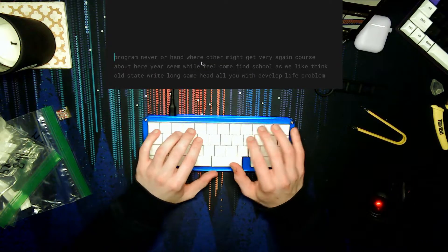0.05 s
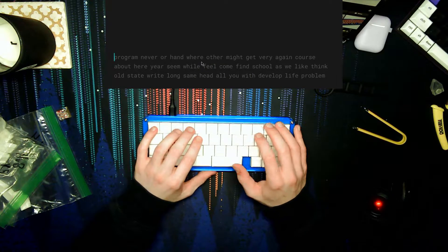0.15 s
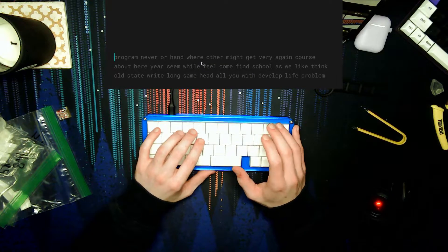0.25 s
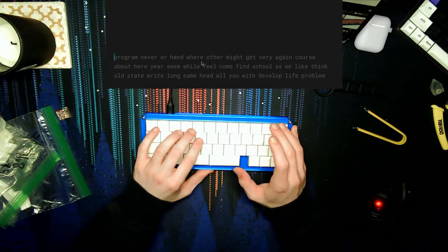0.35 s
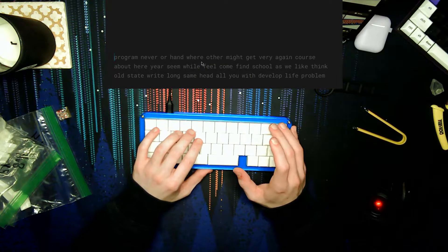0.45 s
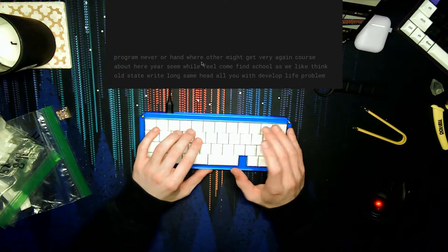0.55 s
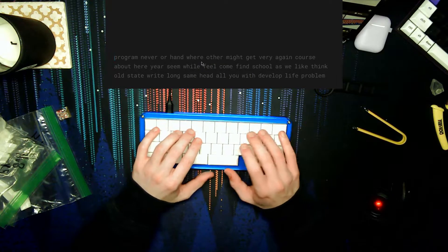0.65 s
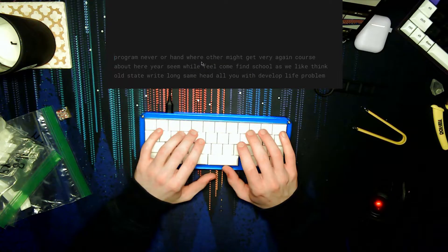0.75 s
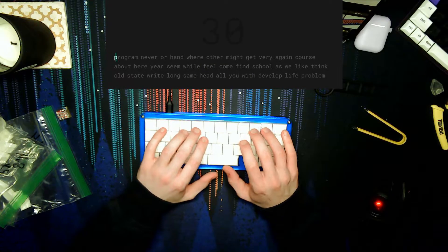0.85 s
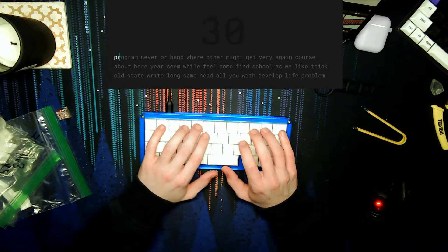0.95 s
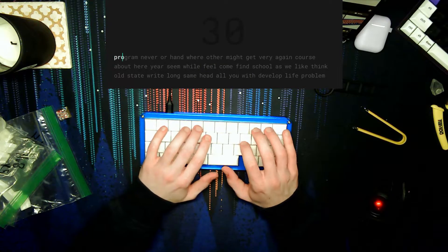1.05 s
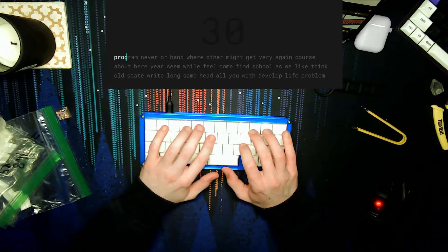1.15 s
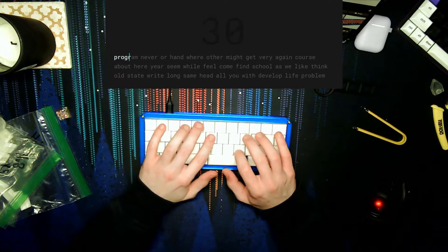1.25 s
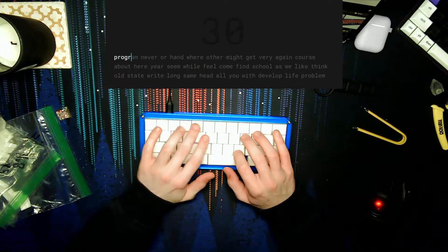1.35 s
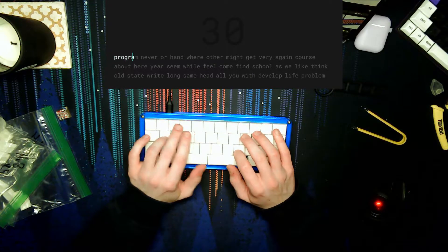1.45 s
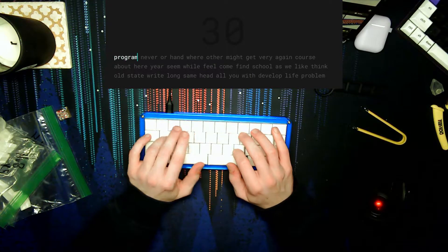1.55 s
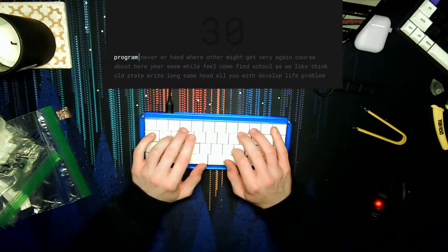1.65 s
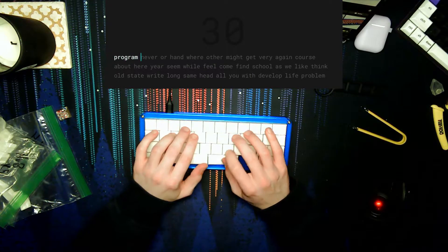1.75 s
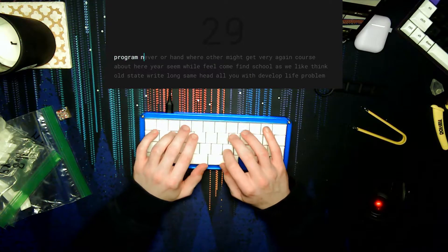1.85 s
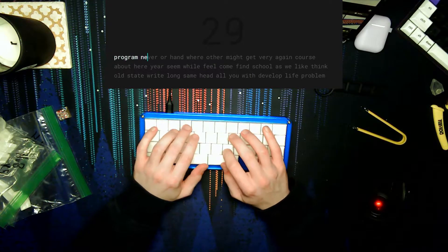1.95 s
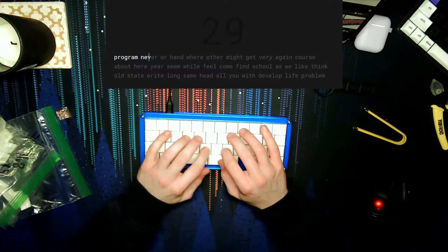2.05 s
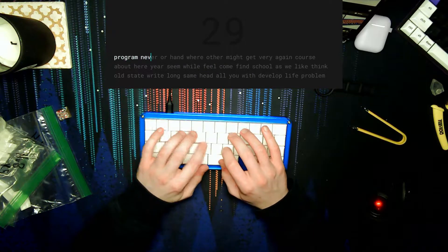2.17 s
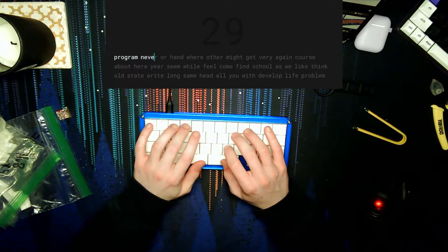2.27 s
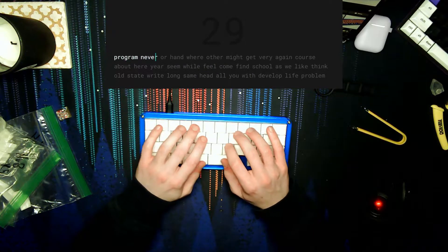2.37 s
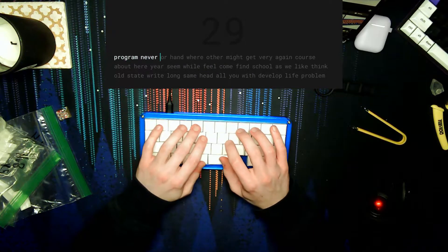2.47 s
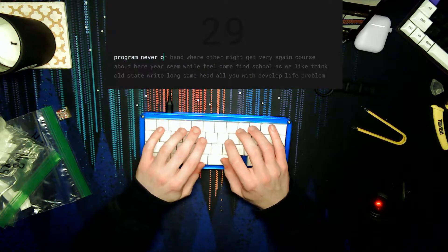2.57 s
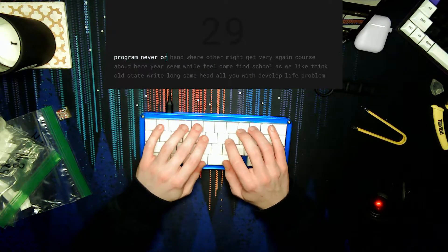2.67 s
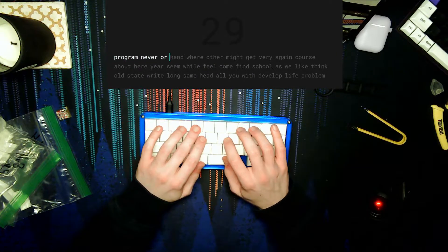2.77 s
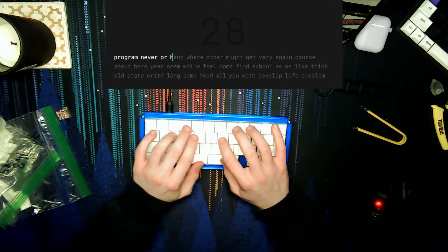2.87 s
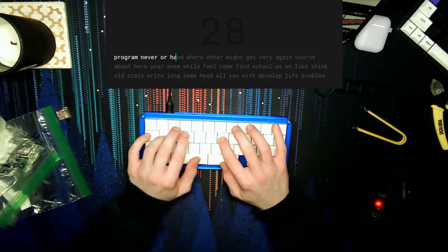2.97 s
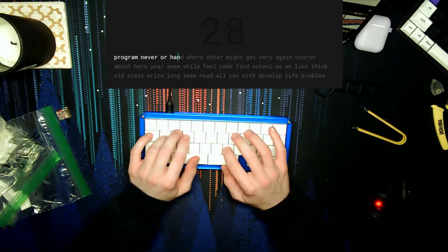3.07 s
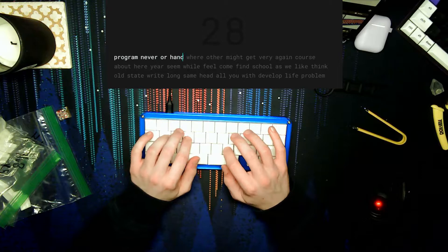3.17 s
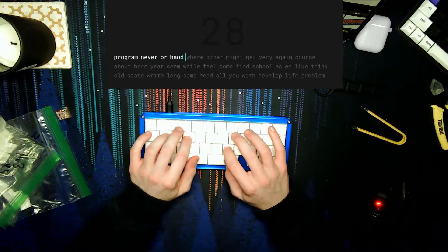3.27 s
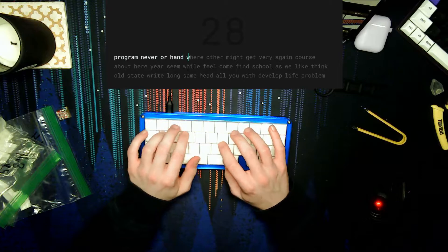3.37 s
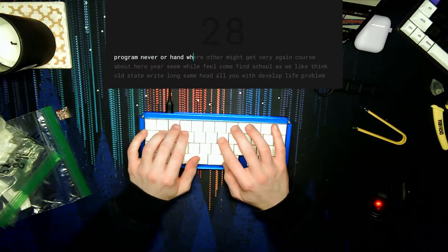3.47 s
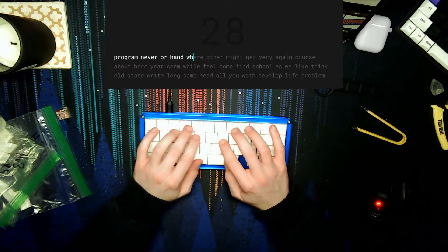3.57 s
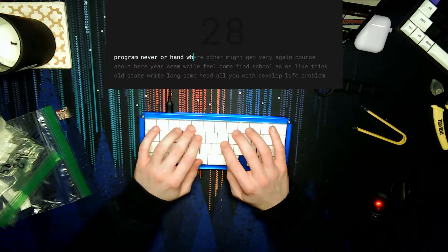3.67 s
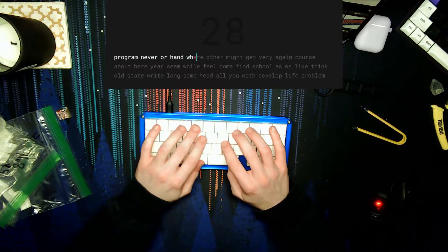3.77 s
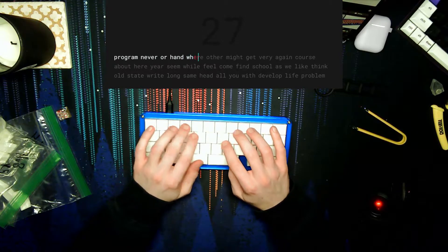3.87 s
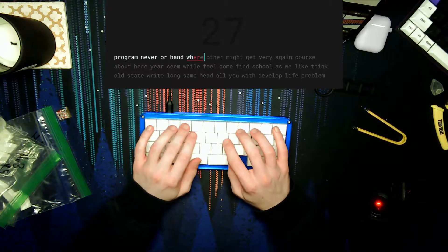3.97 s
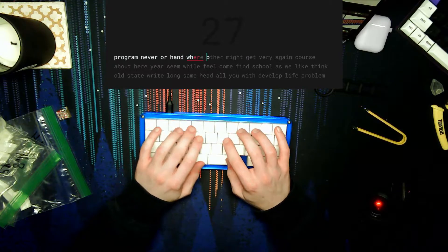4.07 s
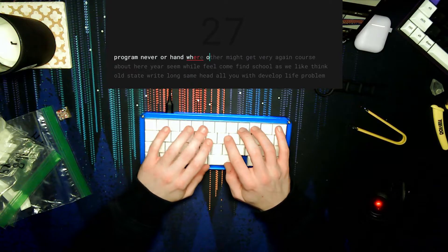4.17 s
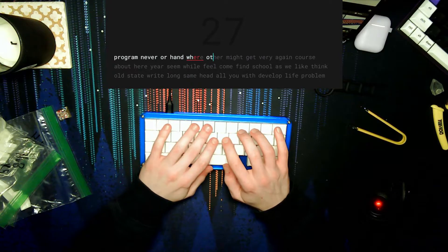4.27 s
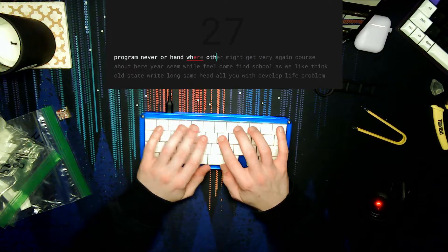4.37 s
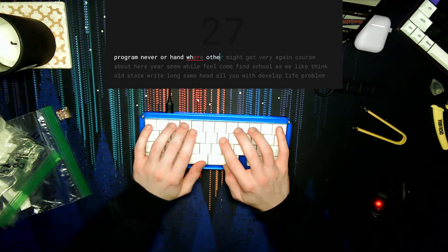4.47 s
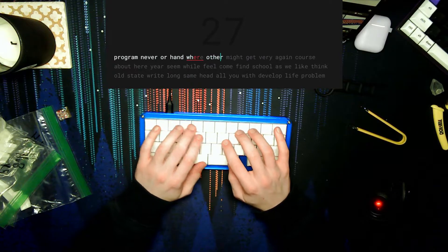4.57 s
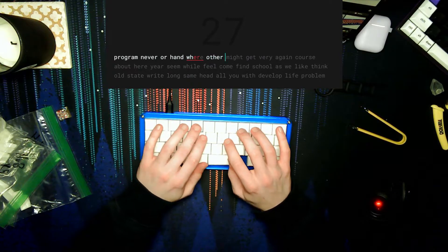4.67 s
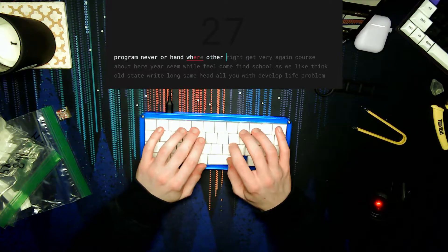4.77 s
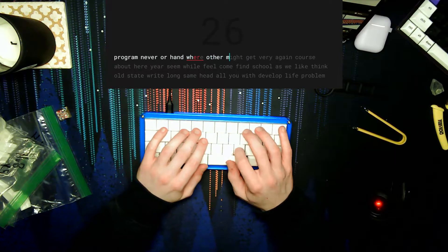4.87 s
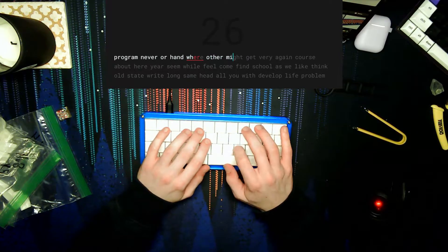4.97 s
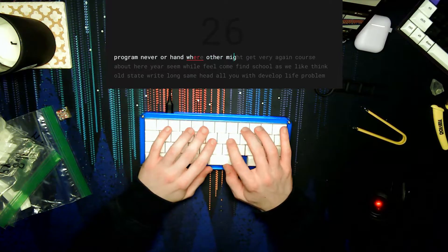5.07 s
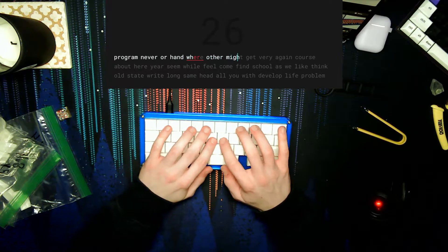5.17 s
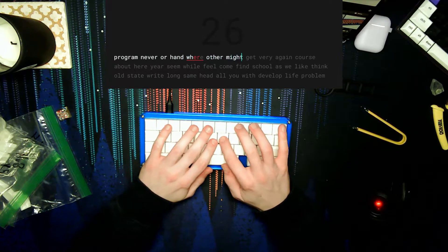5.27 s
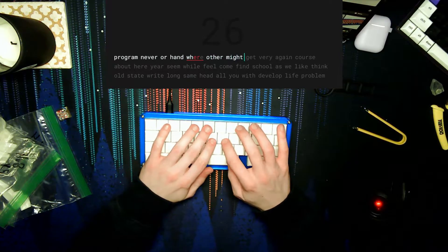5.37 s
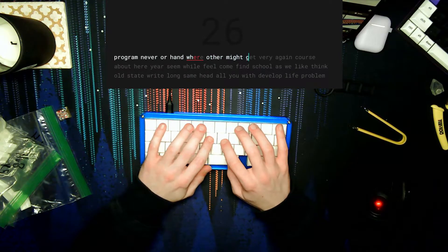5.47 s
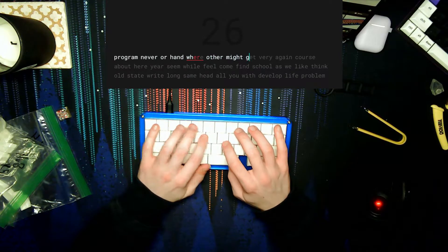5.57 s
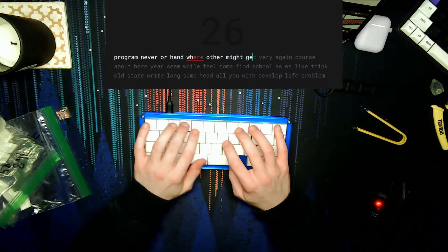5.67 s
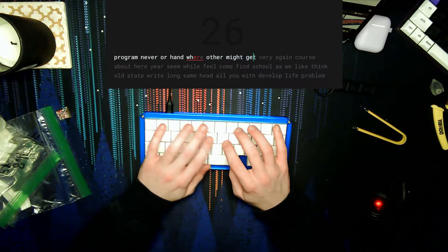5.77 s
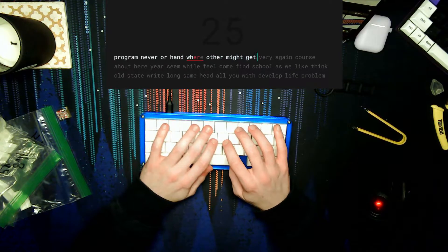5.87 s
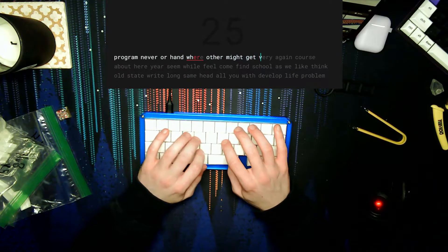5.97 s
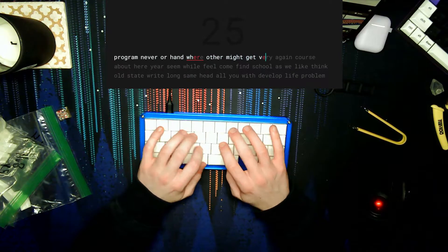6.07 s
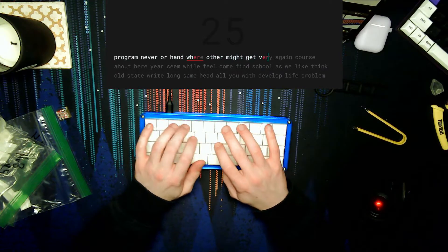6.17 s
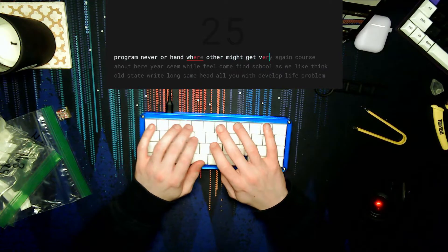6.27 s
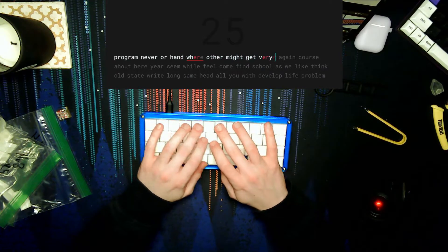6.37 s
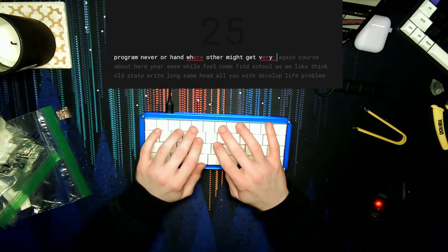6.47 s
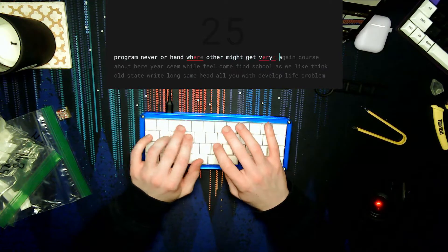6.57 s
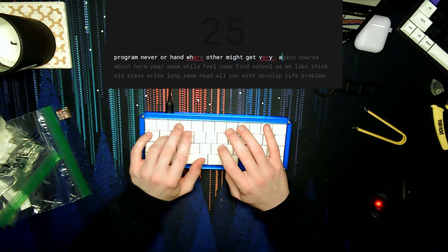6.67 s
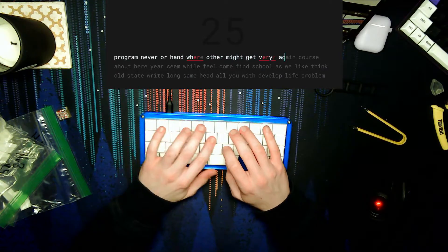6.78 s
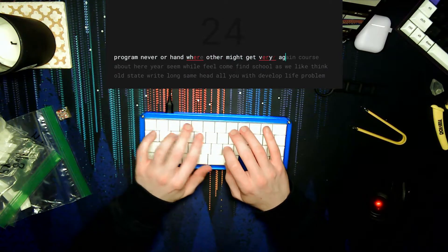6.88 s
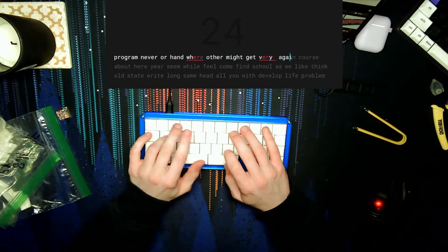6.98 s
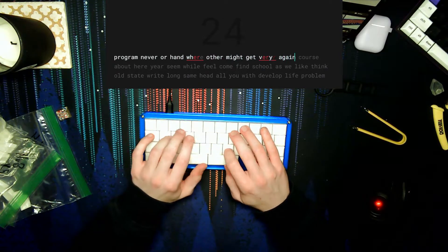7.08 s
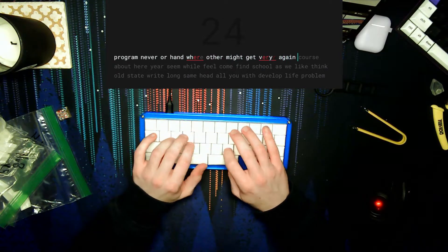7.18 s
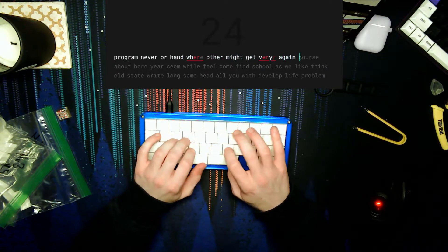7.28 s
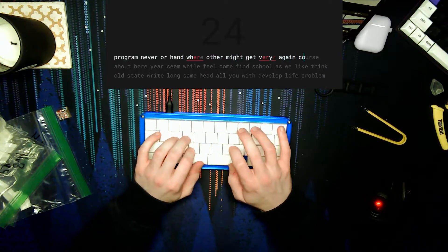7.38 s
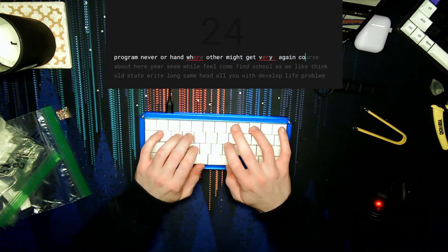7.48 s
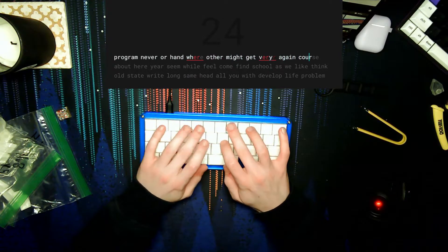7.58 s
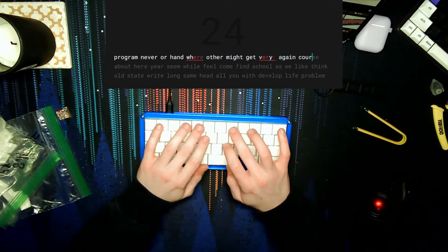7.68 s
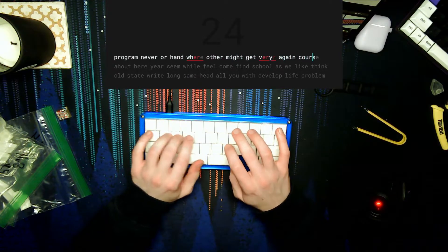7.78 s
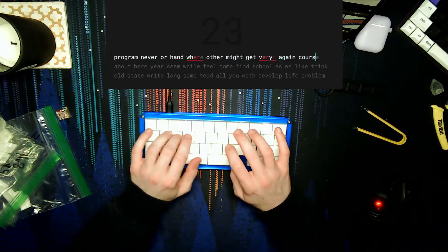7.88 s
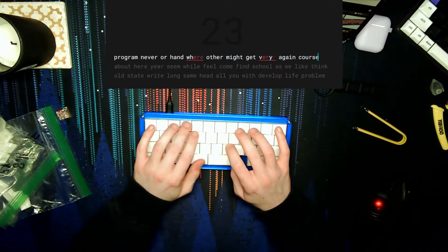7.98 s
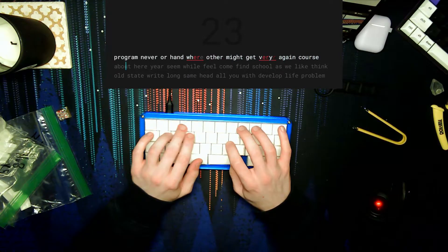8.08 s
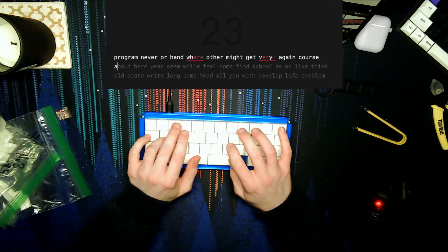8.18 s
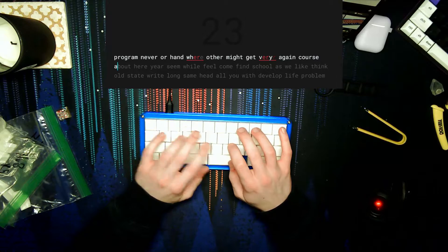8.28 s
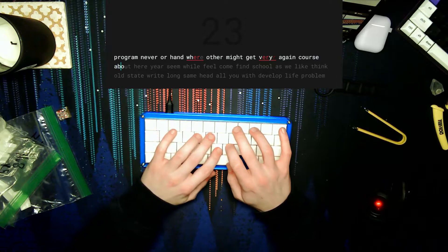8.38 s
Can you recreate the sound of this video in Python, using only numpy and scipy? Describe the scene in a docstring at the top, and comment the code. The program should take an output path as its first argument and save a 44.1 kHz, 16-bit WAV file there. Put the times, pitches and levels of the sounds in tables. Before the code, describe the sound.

A short rubbing slide and a pause, then rapid keyboard clacks with dull low thumps through the desk, close and dry over faint hiss.

```python
"""Fast typing on a small mechanical keyboard, heard by a microphone that stands on the same desk.
Each key clicks through the air: damped modes of stem and cap, with filtered noise bursts around them.
Pushes ring the modes of the desk in dull thuds and set it rocking on its legs, a pair of low resonances.
The stems scratch in their guides and a forearm slides over the desk mat: noise made by friction.
The microphone adds shaped hiss and a faint whine of harmonic sines."""
import sys
import numpy as np
from scipy.fft import rfft, irfft, next_fast_len
from scipy.io import wavfile
from scipy.ndimage import uniform_filter1d, map_coordinates

SR = 44100
rng = np.random.default_rng(int(sys.argv[2]) if len(sys.argv) > 2 else 0)


def pcm_store(signal):
    """Save signal as 16-bit PCM."""
    levels = np.round(np.clip(np.atleast_2d(signal), -1, 1) * 32767)
    wavfile.write(sys.argv[1], SR, levels.astype(np.int16).T)


N = 371763  # length of the scene [samples]
SCENE_T = np.arange(N) / SR  # [s]
EVENT_T = np.arange(SR // 8) / SR  # time within one short event [s]


def amp(db):
    """Decibels are a logarithm of amplitude: 20 dB is a factor of ten."""
    return 10 ** (np.asarray(db) / 20)


def unit_rms(x):
    """Normalization: the root mean square becomes one."""
    return x / np.sqrt(np.mean(x ** 2) + 1e-20)


def curves(rows):
    """Linear interpolation: one value per sample for each column after the time."""
    start_s, *columns = np.transpose(rows)
    return [np.interp(SCENE_T, start_s, column) for column in columns]


def wobble(rate_hz):
    """Band-limited randomness: a smooth curve through random knots, rate_hz of them a second."""
    knots = rng.standard_normal(int(N * rate_hz / SR) + 4)
    return map_coordinates(knots, [np.arange(N) * rate_hz / SR])


def filtered(x, response):
    """Linear filtering: the spectrum is multiplied by a complex response of frequency."""
    size = next_fast_len(N + SR // 2)  # spare room keeps tails from wrapping round
    spectrum = rfft(x, size) * response(np.fft.rfftfreq(size, 1 / SR))
    return irfft(spectrum, size)[:N]


def shaped(points):
    """Spectral envelope: gain through (Hz, dB) points on a logarithmic frequency axis."""
    point_hz, point_db = np.transpose(points)
    return lambda f: amp(np.interp(np.log(f + 1), np.log(point_hz), point_db))


def resonant(modes):
    """Modal superposition: (Hz, width Hz, dB) resonances add with alternating sign."""
    def response(f):
        total = 0
        for k, (center, width, db) in enumerate(modes):
            mode = 1j * f * width / (center * center - f * f + 1j * f * width)
            total = total + (-1) ** k * amp(db) * mode
        return total
    return response


def noise(response):
    """Coloured noise: white noise through a response, at unit RMS."""
    return unit_rms(filtered(rng.standard_normal(N), response))


def placed(times, rows):
    """Superposition in time: one row of samples is added at each time."""
    first = np.round(np.asarray(times) * SR).astype(int)[:, None]
    at = first + np.arange(rows.shape[1])
    return np.bincount(at.ravel(), rows.ravel(), N + SR)[:N]


def blow_envelope(level_db, t60, attack):
    """Damped response to a blow: quick exponential onset, then a fall of 60 dB in t60 seconds."""
    decay = amp(np.reshape(level_db, (-1, 1)) - 60 * EVENT_T / t60)
    return decay * (1 - np.exp(-EVENT_T / attack))


def ring(times, level_db, pitch_hz, t60, attack, spread, count=1):
    """Free vibration: each blow rings a cluster of close damped modes, scattered anew in pitch."""
    scatter = 1 + spread * rng.standard_normal((len(times), count, 1))
    mode_hz = np.reshape(pitch_hz, (-1, 1, 1)) * scatter
    tones = np.sin(2 * np.pi * mode_hz * EVENT_T).sum(1) / np.sqrt(count)
    return placed(times, blow_envelope(level_db, t60, attack) * tones)


def burst(times, level_db, t60, attack):
    """Impact noise: a puff of white noise after each blow."""
    white = rng.standard_normal((len(times), len(EVENT_T)))
    return placed(times, blow_envelope(level_db, t60, attack) * white)


# Spectral envelope of the hiss: pitch_hz [Hz], level_db [dB, relative]
HISS_SPECTRUM = [(25, -11), (60, -12), (105, -19), (180, -19), (300, -27), (550, -32.5), (1000, -36),
                 (2000, -40), (4000, -42.5), (9000, -44), (12000, -45.5), (15700, -48.5)]


def microphone_hiss():
    """Stationary random noise: a steady hiss, densest at low frequencies."""
    return amp(-58.5) * noise(shaped(HISS_SPECTRUM))


# Harmonics of the whine: multiple [of the fundamental], level_db [dB RMS]
WHINE_HARMONICS = [(1, -84), (3, -88), (4, -90), (5, -102), (6, -88.5), (7, -91.5), (10, -107.5), (12, -95),
                   (13, -105), (15, -99)]


def link_whine():
    """Harmonic series: the digital link leaks a comb of thin tones at multiples of one pitch."""
    link_hz = 1000
    whine = np.zeros(N)
    for multiple, level_db in WHINE_HARMONICS:
        tone = np.sin(2 * np.pi * multiple * link_hz * SCENE_T)
        whine += amp(level_db) * np.sqrt(2) * tone  # root two: a sine of unit RMS
    return whine


# Course of the slide: start_s [s], rumble_db, squeak_db, cloth_db [dB, before each layer's gain]
FOREARM_SLIDE = [(.14, -92, -97, -89), (.165, -51, -76, -81), (.2, -75, -77, -71), (.22, -60.5, -65, -66),
                 (.27, -61, -82, -71), (.32, -62, -69.5, -68), (.365, -62, -69, -66.5), (.4, -60, -86, -79),
                 (.43, -100, -105, -100)]
# Resonances of the mat: pitch_hz [Hz], width_hz [Hz], level_db [dB, relative]
MAT_MODES = [(163, 15, 4.5), (210, 85, -4.5), (294, 82, -6), (410, 43, -2.5)]
SLIP_PEAK_S, SLIPS_PER_S, SQUEAK_HZ = .215, 29, 964  # time of one slip's peak; mean squeak pitch


def forearm():
    """Stick-slip friction: the forearm judders over the mat, rumbling and squeaking; cloth hisses."""
    rumble_db, squeak_db, cloth_db = curves(FOREARM_SLIDE)
    slips = np.cos(np.pi * SLIPS_PER_S * (SCENE_T - SLIP_PEAK_S)) ** 2
    rumble = amp(rumble_db - 2.0) * (1.17 + slips) * noise(resonant(MAT_MODES))
    squeak_phase = 2 * np.pi * np.cumsum(SQUEAK_HZ + 15 * wobble(30)) / SR
    squeak = amp(squeak_db + 5.0) * slips * unit_rms(np.sin(squeak_phase))
    cloth = amp(cloth_db) * noise(resonant([(6540, 6300, 0)]))
    return rumble + squeak + cloth


# Pushes of the keyboard into the desk: start_s [s], rocking_db [dB, before the low-pass],
# low_db, middle_db, high_db [dB for each desk mode family, before the common gain]
DESK_PUSHES = [(0.554, -54, -59.5, -59.5, -65.0), (0.839, -39.5, -50.0, -45.0, -52.5),
               (0.926, -40, -46.0, -47.5, -50), (1.046, -39.5, -42.0, -38.0, -51.5),
               (1.112, -43.0, -42.5, -48, -67), (1.254, -40, -50.5, -51.5, -54.5),
               (1.452, -44, -46.5, -46, -52.5), (1.525, -58, -48.5, -50, -69),
               (1.631, -35.0, -47.5, -55.0, -49), (1.66, -49, -54, -46.5, -57),
               (1.782, -49, -42, -50, -72.0), (1.8, -46, -54, -43, -63.0),
               (1.867, -37.5, -48.5, -47.5, -57.5), (1.908, -68, -55, -52, -60),
               (2.03, -38.5, -46, -46, -63), (2.056, -66, -66, -45, -65), (2.125, -49, -63, -53.5, -60),
               (2.204, -54, -44, -46.5, -60), (2.376, -40, -43.5, -47.5, -53.0),
               (2.411, -38.0, -54, -57.0, -63), (2.483, -42.5, -48.5, -55, -62),
               (2.527, -44, -56, -48.5, -73.0), (2.603, -45.5, -49.5, -56, -58),
               (2.624, -61.0, -49, -49.5, -54), (2.71, -40.0, -50, -56, -61), (2.739, -47, -52, -45, -65),
               (2.835, -44, -41, -50, -57.5), (2.854, -53, -53.0, -45.5, -71),
               (2.948, -38, -54, -50.5, -55), (3.046, -41.5, -48.5, -49.0, -76),
               (3.081, -68.0, -56.0, -51, -76.0), (3.142, -52, -47.5, -64.0, -73.0),
               (3.218, -41.5, -68, -51.0, -53), (3.259, -36, -57.0, -42.5, -56),
               (3.343, -42, -52, -46.5, -60.0), (3.382, -36, -45, -48, -59), (3.402, -58, -52, -48.5, -60),
               (3.696, -46.5, -51.5, -52, -56.5), (3.84, -43.5, -44, -47.5, -56),
               (3.888, -62.0, -52, -53.0, -66), (3.923, -43.5, -57.0, -43, -63.0),
               (4.047, -42.0, -44, -44.0, -54), (4.155, -46.0, -44, -50.0, -53.5),
               (4.274, -50.5, -43, -44, -58.0), (4.307, -69.0, -60, -48, -65),
               (4.368, -45.5, -49, -49, -56.5), (4.388, -61, -49, -49, -64.0),
               (4.47, -49.5, -73.0, -54, -71), (4.564, -40.5, -42, -48, -50.5),
               (4.627, -43.5, -52.0, -42.5, -58), (4.738, -39, -65.0, -46.5, -80),
               (4.766, -56.0, -45, -45.5, -78), (4.789, -46, -49, -48, -76.0),
               (4.883, -41.0, -47, -50.5, -52.5), (5.051, -38.5, -64.0, -50.5, -73),
               (5.122, -40, -44, -50, -67), (5.139, -57, -50, -47, -58), (5.236, -41, -50.5, -50.5, -52.5),
               (5.322, -38.0, -57, -69, -55.5), (5.388, -48.0, -44, -51, -69), (5.42, -67, -52, -49, -64),
               (5.496, -57, -68, -56, -57.0), (5.547, -45.5, -48, -56.0, -57),
               (5.57, -57.0, -47, -54.0, -64), (5.749, -49.0, -45.5, -46, -48.5),
               (5.822, -49, -58.0, -54.0, -63.0), (5.862, -42.5, -64.0, -50, -61.0),
               (5.936, -44, -54, -46, -63.0), (6.117, -54, -42.0, -47, -58),
               (6.288, -44, -45, -51.5, -51.0), (6.432, -48, -52.5, -50, -52.5),
               (6.462, -41.0, -50, -42, -52.5), (6.557, -40, -48.5, -45.5, -57),
               (6.714, -51, -47.5, -46.5, -64), (6.733, -60.0, -45.5, -48, -60),
               (6.801, -52, -71, -57, -58), (6.873, -37.5, -62, -58, -57), (6.894, -54, -54.5, -47, -53.5),
               (6.978, -64, -48.5, -53, -67), (7.024, -37.5, -52, -45, -58),
               (7.142, -35.5, -49.0, -38, -50), (7.25, -34.5, -41, -45.0, -64), (7.333, -39, -46, -46, -56),
               (7.489, -52.0, -44.5, -46, -50.5), (7.758, -39, -51.5, -52, -63),
               (7.935, -40.0, -46, -49, -58), (7.979, -52, -50.5, -51, -56.5),
               (8.013, -49, -43.0, -42.5, -61), (8.097, -38.5, -57.0, -51, -60.5),
               (8.129, -46, -47, -49, -58), (8.288, -56, -42, -44.0, -62), (8.305, -56.0, -48.5, -40, -61),
               (8.384, -53.0, -56, -50.5, -57)]
# Modes of desk and case, one family per line: pitch_hz [Hz], level_db [dB, relative], t60_s [s]
DESK_MODES = [
    [(103.1, 3, 0.12), (62.9, -1.5, 0.19)],
    [(164.2, 3, 0.092), (199, -18.5, 0.043), (138.5, 0, 0.1)],
    [(288.5, -2, 0.1), (382.6, -1, 0.077), (239, -3.5, 0.053), (472, -5.5, 0.043), (600, -5, 0.03)],
]
# Rocking resonances, passed twice: pitch_hz [Hz], width_hz [Hz], level_db [dB, relative]
LEG_MODES = [(37.94, 11.5, 3), (47.3, 19, -2.5)]
KICK_DELAY_S, RESTLESS_DB = 0.0206, -56  # from push to swing; hands resting on the desk, before the low-pass


def desk_thuds():
    """Modal excitation: soft pushes, with a slow onset, ring the modes of desk and case."""
    start_s, _, *family_levels = np.transpose(DESK_PUSHES)
    thuds = np.zeros(N)
    for family, family_db in zip(DESK_MODES, family_levels):
        for pitch_hz, mode_db, t60_s in family:
            thuds += ring(start_s, family_db + mode_db + 6.0, np.full(len(start_s), pitch_hz),
                          t60_s, attack=0.0066, spread=0.048)
    return thuds


def desk_rocking():
    """Impulse response: every push kicks the desk into rocking; resting hands keep it faintly astir."""
    start_s, rocking_db = np.transpose(DESK_PUSHES)[:2]
    legs = resonant(LEG_MODES)
    swing = filtered(np.arange(N) == 0, lambda f: legs(f) ** 2)[:SR // 2]
    swing = swing / np.abs(swing).max()
    rocking = placed(start_s + KICK_DELAY_S, amp(rocking_db)[:, None] * swing)
    restless = amp(RESTLESS_DB) * noise(lambda f: legs(f) ** 2)
    return filtered(rocking + restless, lambda f: 1 / (1 + (f / 62) ** 12))  # steep low-pass at 62 Hz


# Further scratches, as keys creep down or come back up:
# start_s [s], length_s [s], level_db [dB, before the gains of stem and cap]
KEY_TRAVEL = [(0.01, 0.039, -64.5), (1.398, .03, -73), (1.598, 0.054, -72), (1.92, 0.052, -69.5),
              (2.258, 0.027, -69), (2.409, .04, -72.5), (2.704, .05, -76), (3.1, .03, -73),
              (3.494, 0.045, -70), (3.728, 0.024, -71), (4.212, 0.046, -69.5), (4.604, 0.042, -68.5),
              (4.86, 0.027, -70), (5.976, 0.034, -67.5), (6.267, 0.026, -66), (6.362, 0.055, -73),
              (6.61, .035, -73), (6.77, .04, -71), (7.454, 0.039, -73), (7.575, 0.033, -70),
              (7.636, .045, -66.5), (7.829, 0.031, -64), (7.959, 0.056, -68), (8.35, .045, -70.5)]
STROKE_GAP_S = .03  # contacts closer than this belong to one stroke
SCRATCH_LEAD_S, SCRATCH_S, SCRATCH_DB = .006, 0.039, -70.5  # lead on the contact, median length, mean level
SCRATCH_FOLLOWS, STEM_HZ = 0.12, 8600  # share of the tick's dB; band centre of the further scratches


def travel():
    """Sliding friction: grainy rubbing rings the stem in a narrow band and the whole cap broadly."""
    new_stroke = np.diff(np.transpose(KEY_CONTACTS)[0], prepend=0) > STROKE_GAP_S
    contact_s, tick_db, tick_hz = np.transpose(KEY_CONTACTS)[:3, new_stroke]
    draw = rng.standard_normal((len(contact_s), 2))
    struck_length_s = SCRATCH_S * amp(1.14 * draw[:, 0])
    struck_db = SCRATCH_DB + SCRATCH_FOLLOWS * (tick_db - tick_db.mean()) + 1.1 * draw[:, 1]
    struck = [contact_s - SCRATCH_LEAD_S, struck_length_s, struck_db, tick_hz]
    further = np.transpose([tuple(row) + (STEM_HZ,) for row in KEY_TRAVEL])
    start_s, length_s, level_db, pitch_hz = np.hstack([struck, further])[:, :, None]

    fades = np.minimum(EVENT_T / 0.0085, (length_s - EVENT_T) / 0.0099)
    stroke = np.clip(fades, 0, 1) * amp(level_db)
    # two slow noises on a cosine and a sine make a narrow band around the pitch
    slow = uniform_filter1d(rng.standard_normal((2, len(start_s), len(EVENT_T))), size=60)
    phase = 2 * np.pi * pitch_hz * EVENT_T
    stem = unit_rms(slow[0] * np.cos(phase) + slow[1] * np.sin(phase))
    cap = noise(resonant([(2720, 610, 2.5), (5640, 2300, -7.5), (9100, 1380, 2.0)]))
    grain = amp(3.4 * wobble(900) + 1.7 * wobble(90))
    stem_scratch = amp(-5.5) * placed(start_s[:, 0], stroke * stem)
    cap_scratch = amp(-0.5) * placed(start_s[:, 0], stroke) * cap
    return grain * (stem_scratch + cap_scratch)


# Contacts of the long keys: start_s [s], wire_db (steadying wire),
# hollow_db (hollow cap) [dB, before each layer's gain]
LONG_KEY_CONTACTS = [(1.037, -52, -60.5), (1.6302, -45, -66.5), (1.6334, -52, -55), (2.7066, -53.5, -64),
                     (3.2204, -46.5, -61), (3.8815, -50, -66), (4.5444, -68, -74), (4.582, -47.5, -63),
                     (5.3139, -43, -62), (5.815, -52, -64.5), (6.425, -44.5, -63), (7.0784, -57, -77),
                     (7.1051, -48, -57), (7.1079, -50, -64), (7.969, -52, -64.5)]


def long_keys():
    """Coupled vibration: a steel wire pings and buzzes under wide caps, which knock lower than small ones."""
    start_s, wire_db, hollow_db = np.transpose(LONG_KEY_CONTACTS)
    start_s = start_s + .0007  # the sound peaks just after the first touch
    wire = ring(start_s, wire_db + 4.5, np.full(len(start_s), 5010.), t60=0.0099, attack=0.00013, spread=0.0062)
    buzz = burst(start_s, wire_db - 0.5, t60=0.14, attack=0.00088)
    buzz = filtered(buzz, resonant([(4920, 280, 0.5), (7140, 690, -8)]))
    knock = burst(start_s, hollow_db + 27.5, t60=0.011, attack=0.0013)
    knock = filtered(knock, resonant([(524, 230, 1.4), (1130, 570, 5.6)]))
    return wire + buzz + knock


# Key contacts: start_s [s], tick_db [dB, before gain] and tick_hz [Hz, mean] of the stem,
# cap_db [dB, before gain] and cap_hz [Hz, mean] of the keycap
KEY_CONTACTS = [(0.1237, -42, 6560, -41, 2600), (0.1618, -72, 7240, -57, 2070),
                (0.811, -51, 8900, -61, 2560), (0.9052, -44, 8050, -54, 2770),
                (1.0375, -33, 8500, -50, 2460), (1.089, -58, 8020, -56, 3070),
                (1.1123, -41.5, 7700, -51, 3300), (1.228, -48.5, 9400, -66, 3140),
                (1.2661, -44.5, 7600, -50.5, 3200), (1.312, -49, 7050, -67, 3500),
                (1.316, -51, 9100, -71, 2690), (1.4293, -48.5, 7400, -46.5, 2710),
                (1.4937, -46, 8000, -55.5, 2950), (1.6312, -49, 7400, -52, 2470),
                (1.6334, -47, 8400, -50, 2030), (1.6576, -63, 8090, -58, 3140),
                (1.7803, -55, 8300, -53, 2470), (1.7824, -42.5, 6540, -47.5, 2900),
                (1.8644, -60, 9650, -57, 2480), (1.87, -56, 8600, -54, 2480),
                (2.0263, -53, 8700, -69, 3110), (2.0302, -39.5, 8400, -50, 3800),
                (2.0952, -59, 8190, -73, 2920), (2.1898, -52, 9270, -67, 2710),
                (2.193, -57, 8700, -52.5, 2320), (2.35, -51, 8840, -64, 2800),
                (2.4844, -42, 8900, -49, 2600), (2.485, -46.5, 9040, -58, 2680),
                (2.5921, -62, 7520, -57, 3120), (2.6056, -53, 8800, -62, 2720),
                (2.659, -55, 8850, -57, 3120), (2.694, -47, 7750, -68, 3100),
                (2.7084, -49, 8300, -55, 2460), (2.831, -49, 8600, -57, 3140),
                (2.8344, -40, 7700, -46.5, 3130), (2.9213, -55, 7700, -55.5, 2900),
                (3.045, -48, 8650, -54, 2470), (3.134, -54.5, 6500, -71, 2540),
                (3.2215, -48, 7800, -50, 2680), (3.3465, -38.5, 8850, -49.5, 2780),
                (3.3837, -41.5, 8300, -50, 3260), (3.6755, -55, 8300, -60, 2690),
                (3.6848, -64, 8840, -59, 3470), (3.7468, -43.5, 9560, -73, 2020),
                (3.8224, -52.5, 9400, -69, 2570), (3.8276, -53, 9300, -56, 2220),
                (3.882, -57, 7570, -58, 2590), (4.04, -38, 9000, -50, 2420),
                (4.119, -61, 8600, -54.5, 3000), (4.156, -40, 9200, -50, 2600),
                (4.2714, -44, 8240, -53, 3350), (4.2747, -43, 8400, -49, 3040),
                (4.369, -57, 7600, -65, 2650), (4.372, -49, 8950, -53.5, 2540),
                (4.4646, -55, 9800, -65, 2580), (4.5446, -51, 9180, -59, 2440),
                (4.5806, -54, 7700, -54.5, 2530), (4.738, -66, 7240, -70, 2900),
                (4.7622, -46, 8300, -55, 3270), (4.765, -42, 8450, -48, 2880),
                (4.862, -52, 7600, -54, 2640), (4.8767, -56, 8000, -60, 2450),
                (4.9445, -61, 8190, -55.5, 3150), (4.9656, -49, 9300, -59, 2730),
                (4.986, -54, 8960, -54, 3140), (5.0186, -48, 7860, -53, 3330),
                (5.022, -57, 8400, -68, 2900), (5.118, -51, 8800, -63, 3250),
                (5.122, -40.5, 8550, -48, 3120), (5.191, -56, 8000, -68, 2900),
                (5.212, -50, 9150, -56.5, 2700), (5.315, -42, 7600, -49, 2840),
                (5.3766, -49, 8000, -69, 3660), (5.3911, -45, 8400, -49.5, 3130),
                (5.481, -57, 9050, -58, 3030), (5.5507, -44, 8800, -52, 2560),
                (5.629, -51, 9450, -75, 2830), (5.7387, -47, 8800, -51, 2560),
                (5.814, -54, 7200, -60, 2890), (5.9064, -40, 8400, -54.5, 3320),
                (6.1042, -52, 8900, -53.5, 2630), (6.183, -54.5, 9310, -84, 2460),
                (6.2456, -51, 9000, -60, 2880), (6.249, -48, 8700, -60, 3370),
                (6.266, -45, 8000, -66, 2630), (6.3341, -49, 7900, -57.5, 3170),
                (6.4244, -44, 7300, -48, 2670), (6.5307, -54, 8340, -49, 2640),
                (6.7116, -54, 8600, -61, 2270), (6.7147, -44.5, 7700, -47, 3200),
                (6.8718, -61, 8470, -55.5, 2950), (6.9576, -53, 7700, -61, 2760),
                (7.0219, -52, 9200, -63, 2820), (7.0246, -47.5, 8500, -51, 2500),
                (7.0795, -51, 9400, -56, 3030), (7.0863, -55, 7600, -55, 3070),
                (7.1061, -48.5, 8050, -55, 2550), (7.1097, -53, 7400, -46.5, 2420),
                (7.14, -56, 7270, -60, 2960), (7.226, -57, 9100, -56.5, 2630),
                (7.2486, -37, 8770, -55, 3350), (7.3257, -43, 8450, -47, 2520),
                (7.4275, -56, 8850, -55.5, 3090), (7.486, -46, 9500, -66, 2840),
                (7.4899, -33.5, 8700, -50.5, 2930), (7.5035, -53, 7300, -58, 2630),
                (7.5543, -45, 8050, -62, 2680), (7.6117, -50, 8300, -53, 3370),
                (7.7576, -43.5, 8500, -49.5, 2900), (7.7718, -63, 8400, -51, 2650),
                (7.895, -62, 8800, -62, 2700), (7.914, -49.5, 9220, -64, 2660),
                (8.007, -64, 7650, -53.5, 2530), (8.0515, -60, 8300, -71, 2600),
                (8.092, -50, 8700, -50, 2670), (8.113, -63, 9020, -53.5, 2650),
                (8.2858, -42, 8700, -51, 2600), (8.2887, -45, 8300, -44.5, 2750),
                (8.33, -55, 8580, -60, 2650), (8.4244, -42.5, 8850, -54, 2490)]


def keys():
    """Impact excitation: stem ticks and cap clacks, each with a broad crack and loose parts rattling out."""
    start_s, tick_db, tick_hz, cap_db, cap_hz = np.transpose(KEY_CONTACTS)
    tick = ring(start_s, tick_db + 3.5, tick_hz, t60=0.007, attack=0.00022, spread=0.063, count=4)
    cap = ring(start_s, cap_db + 0.5, cap_hz, t60=0.012, attack=0.00019, spread=0.07, count=3)
    # a short loud crack, then a longer and weaker rattle
    bright = burst(start_s, tick_db + 4.0, t60=0.009, attack=.0001)
    bright = bright + burst(start_s, tick_db - 9.5, t60=0.065, attack=0.00092)
    dull = burst(start_s, cap_db + 8.5, t60=0.0085, attack=0.000083)
    dull = dull + burst(start_s, cap_db - 9.0, t60=0.13, attack=0.0018)
    stem = resonant([(8400, 2800, -3.5), (11700, 2900, -21)])
    shell = resonant([(1330, 860, -2.0), (2660, 2800, -2.5), (6130, 2000, 0)])
    bright = filtered(bright, lambda f: stem(f) / (1 + 1j * f / 11000))  # with a gentle low-pass
    return tick + cap + bright + filtered(dull, shell)


def scene():
    """Superposition: all sources on the desk add linearly."""
    desk = desk_thuds() + desk_rocking()
    return (forearm() + desk + long_keys() + travel() + keys())[None]


def record(dry):
    """Band limitation: the microphone adds its hiss and whine, then passes nothing above its top."""
    top_hz = 15850
    heard = dry[0] + microphone_hiss() + link_whine()
    return filtered(heard, lambda f: f < top_hz)[None]


dry = scene()
out = record(dry)
pcm_store(out)
```